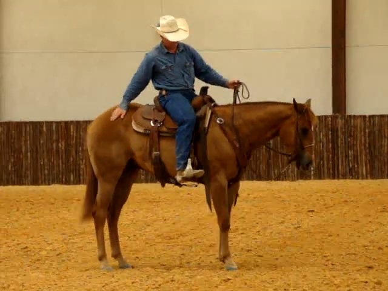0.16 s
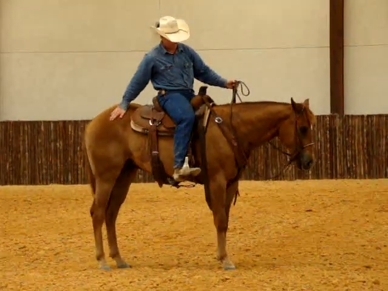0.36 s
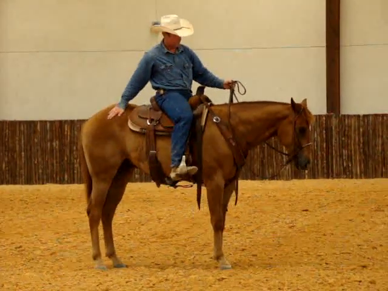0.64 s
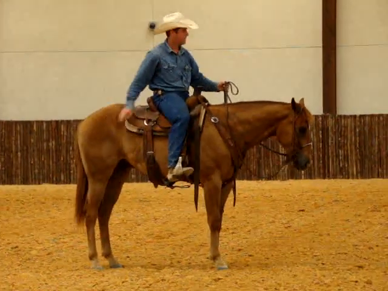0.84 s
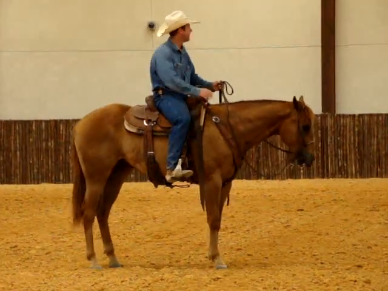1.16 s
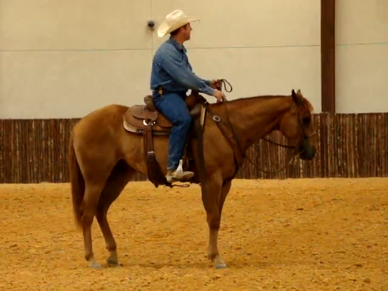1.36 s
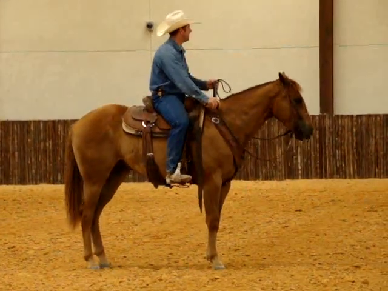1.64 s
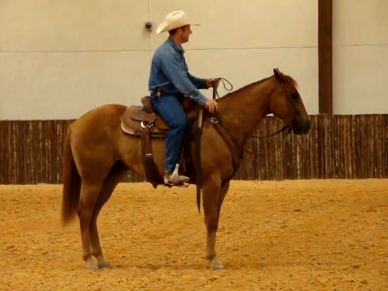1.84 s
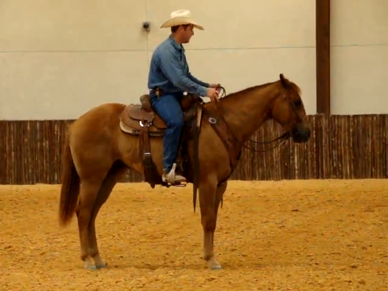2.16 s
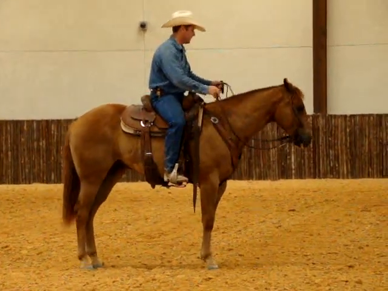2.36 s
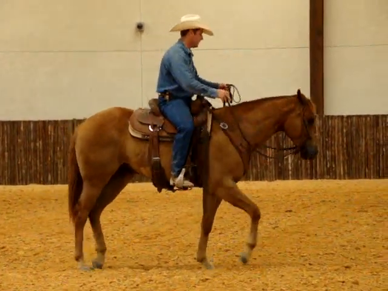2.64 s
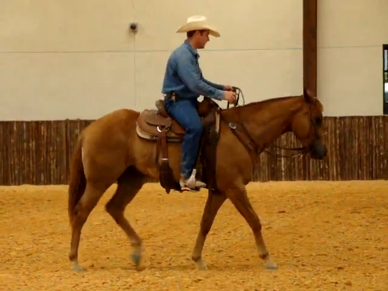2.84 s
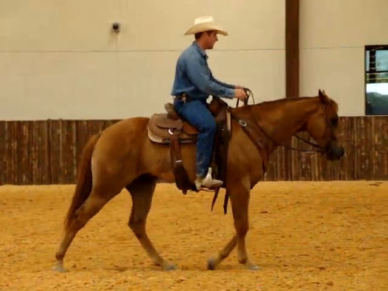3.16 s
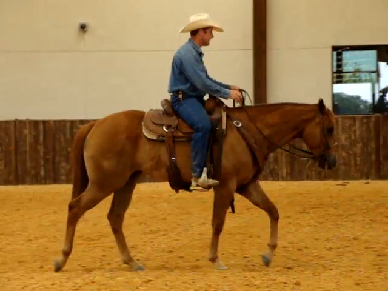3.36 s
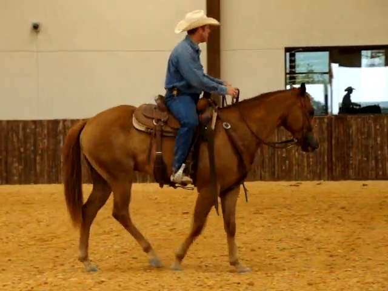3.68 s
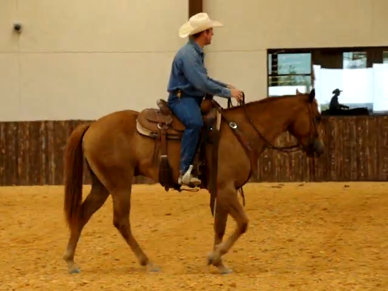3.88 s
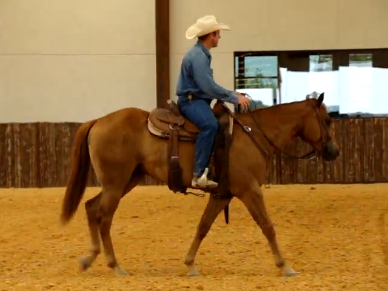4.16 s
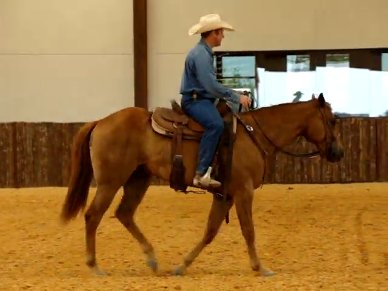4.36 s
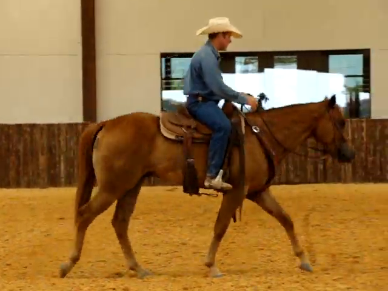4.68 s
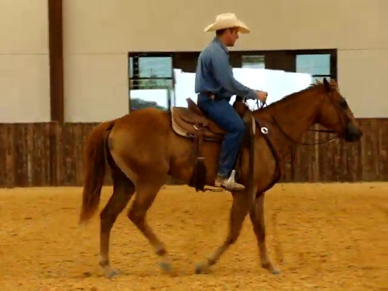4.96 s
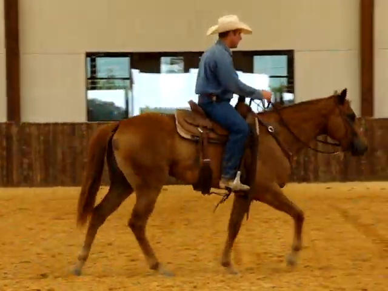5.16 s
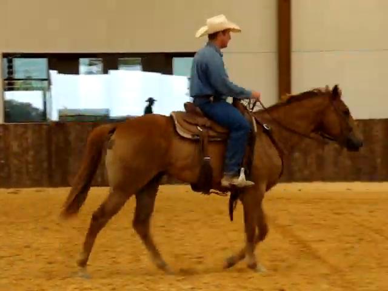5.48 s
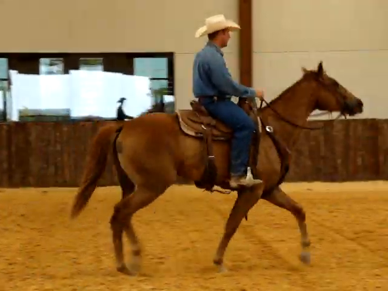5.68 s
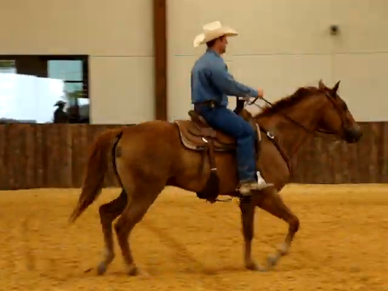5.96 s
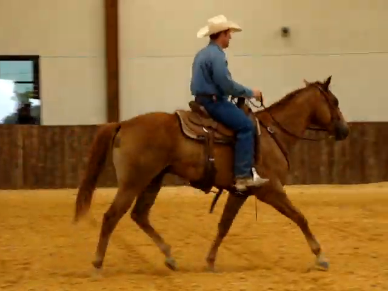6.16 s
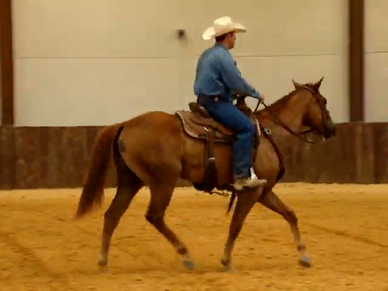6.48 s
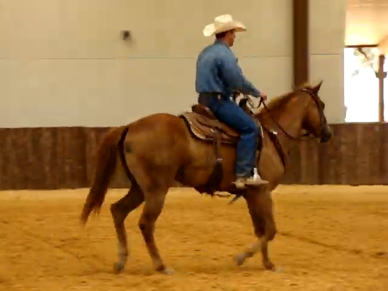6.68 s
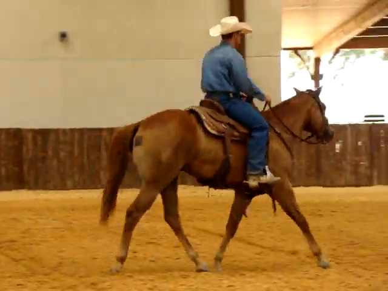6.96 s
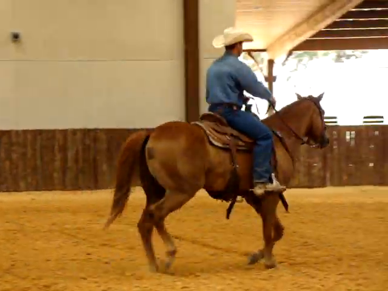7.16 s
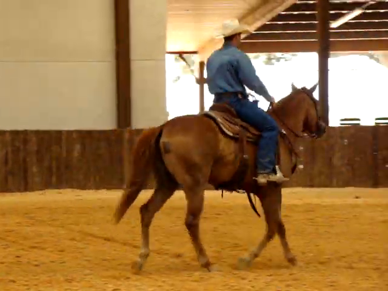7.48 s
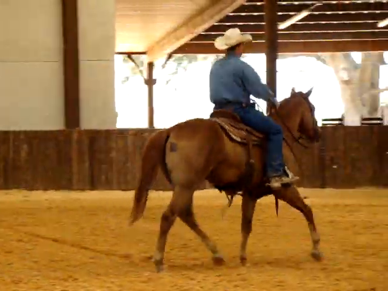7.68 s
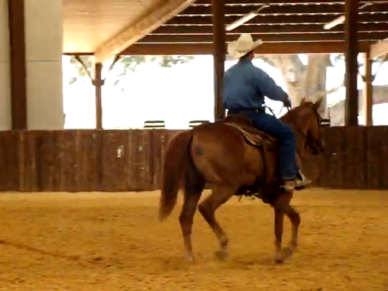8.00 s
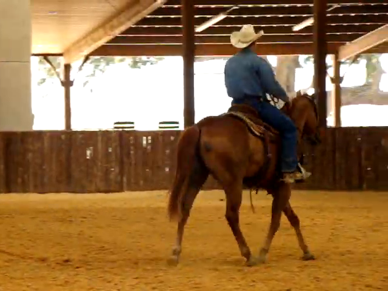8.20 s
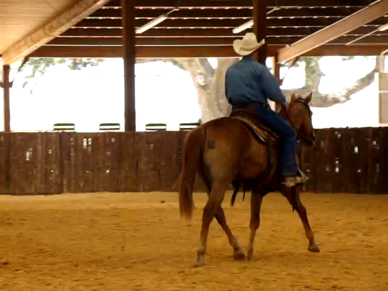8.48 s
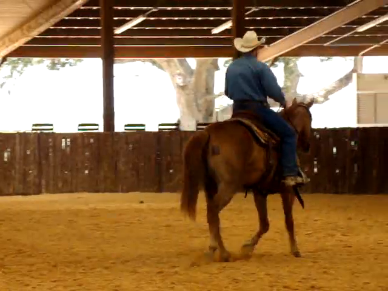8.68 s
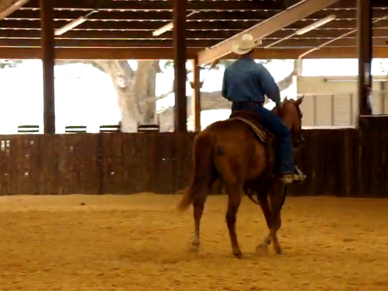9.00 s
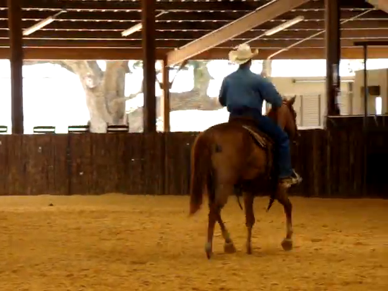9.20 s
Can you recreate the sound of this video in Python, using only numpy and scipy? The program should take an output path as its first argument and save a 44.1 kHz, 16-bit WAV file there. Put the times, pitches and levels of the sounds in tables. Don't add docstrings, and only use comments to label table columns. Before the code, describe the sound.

In a big covered arena, three firm, hollow pats on a horse's rump ring out in the first second and echo off a nearby wall. Sparrows chirp overhead in two syllables throughout. Then small leather and buckle knocks and dry metallic ticks appear, with faint hoof puffs in deep sand later on. Soft airy hiss and faint hum lie beneath, heard through one microphone near the horse, with dull upper treble.

```python
import sys
import numpy as np
from scipy import signal
from scipy.io import wavfile

SR = 44100
rng = np.random.default_rng(int(sys.argv[2]) if len(sys.argv) > 2 else 0)


def natural_amplitude(level_db):
    exponent = np.asarray(level_db, float) / 20
    return 10 ** exponent


def persist_wave(psi):
    counts = np.round(np.clip(psi, -1, 1) * 32767).astype(np.int16)
    wavfile.write(sys.argv[1], SR, np.atleast_2d(counts).T)


N = 411894
LEAD = round(.2 * SR)

# (time [s], peak level [dB], brightness [dB per octave])
PATS = [
    (0.225, -18.5, 3),
    (0.4867, -19.5, 3.5),
    (0.7446, -17.5, 5),
]
# (time [s], peak level [dB], lowest frequency [Hz])
TICKS = [(1.733, -39, 9300), (2.779, -57, 6060), (4.271, -52, 5490), (4.73, -43.5, 5513),
         (6.643, -47, 9070), (6.794, -44, 8970), (7.05, -44.5, 8100), (7.509, -42, 5550),
         (7.661, -46, 5900), (7.718, -42, 5200), (8.37, -40.5, 5200), (8.527, -47, 6500),
         (9.127, -42, 5250)]

FIRST_HABIT = dict(lead_s=.058, lead_db=-21, top_hz=4950, sag=.885, second_hz=3950)
SECOND_HABIT = dict(lead_s=.038, lead_db=-19, top_hz=4850, sag=.91, second_hz=3850)
FAR_HABIT = dict(lead_s=.036, lead_db=-12, top_hz=5350, sag=.78, second_hz=4300)
FLUTTER_SHARE = .009
NEAR_TAIL_DB, FAR_TAIL_DB = 4.5, 5.5


def at_hz(points, hz):
    point_hz, value = np.transpose(points)
    return np.interp(np.log(hz), np.log(point_hz), value)


def band(x, low_hz, high_hz):
    return signal.sosfilt(signal.butter(2, [low_hz, min(high_hz, .45 * SR)], "band", fs=SR, output="sos"), x)


def drift(rate):
    steps = rng.standard_normal(int(N / SR * 40) + 3)
    return np.interp(np.arange(N) / SR * min(rate, 40), np.arange(len(steps)), steps)


def ring(clicks, hz, t60):
    r = natural_amplitude(-60 / (t60 * SR))
    w = 2 * np.pi * hz / SR
    return signal.lfilter([0, np.sin(w)], [1, -2 * r * np.cos(w), r * r], clicks + 1e-18)


def clicks_at(seconds, db):
    train = np.zeros(N)
    train[np.round(np.asarray(seconds) * SR).astype(int)] = natural_amplitude(np.asarray(db))
    return train


def pats():
    # (frequency [Hz], width [Hz], level [dB])
    palm = [
        (481, 216, -7),
        (1300, 770, 2),
        (2370, 590, -7),
        (3260, 820, -11),
        (8000, 10000, -16.5),
    ]
    s, db, bright_db = np.transpose(PATS)
    settle = s + .0027 + rng.normal(0, .0003, len(s))
    out = np.zeros(N)
    for k, (hz, width_hz, level_db) in enumerate(palm):
        octaves = np.log2(hz / 1350)
        train = clicks_at(s, db + level_db + bright_db * octaves + 5)
        train += clicks_at(settle, db + level_db - 9 * abs(octaves) - 16.5)
        out += (-1) ** k * ring(train, hz, np.log(1000) / (np.pi * width_hz))
    return band(out, 190, 15000)


def hooves():
    # (time [s], peak level [dB], pitch [Hz], length [s])
    hoof_falls = [(5.661, -56, 508, 0.031), (5.958, -48, 900, 0.024), (6.35, -51.5, 400, 0.077),
                  (6.7, -45, 600, 0.035), (6.758, -49, 400, 0.061), (7.321, -46.5, 464, 0.097),
                  (7.5, -59, 295.4, 0.067), (7.809, -58, 1700, 0.043), (7.837, -42.5, 1206, 0.087),
                  (8.579, -49, 1092, 0.059), (9.15, -71, 902, 0.057)]
    out = np.zeros(N)
    for s, db, hz, length in hoof_falls:
        start = round(s * SR)
        t = np.arange(round(.3 * SR)) / SR / length
        grains = natural_amplitude(2.5 * rng.standard_normal(len(t) // 128 + 1)).repeat(128)[:len(t)]
        crunch = rng.standard_normal(len(t)) * grains
        puff = band(crunch, hz / 1.9, hz * 2.25) * np.sqrt(SR / hz / 4)
        swell = 4 * t * np.exp(-2.5 * t)
        out[start:][:len(t)] += (natural_amplitude(db) * puff * swell)[:N - start]
    return out


def tack_knocks():
    # (time [s], peak level [dB], pitch [Hz], snap level against the ring [dB])
    knock_list = [(2.137, -46.5, 1300, 2), (2.293, -34.5, 520, -2.5), (3.427, -41, 1510, 2),
                  (4.104, -46, 1940, -5), (4.73, -39.5, 874, -3), (4.772, -46, 1980, 4.5),
                  (4.874, -47.5, 1630, 3.5), (6.067, -44.5, 1665, 4), (6.187, -43.5, 1390, -4),
                  (6.539, -53, 991, 9), (6.79, -47, 1900, 4), (7.803, -37, 1780, -0.5),
                  (7.843, -32, 973, -2.5), (8.156, -55, 442, 12), (8.446, -47, 985, 6),
                  (8.535, -41, 850, -3), (8.59, -39.5, 1080, 0.5), (8.631, -37, 1340, 1),
                  (9.139, -41.5, 950, -6)]
    out = np.zeros(N)
    t = np.arange(round(.04 * SR)) / SR
    for s, db, hz, snap_db in knock_list:
        snap = band(rng.standard_normal(len(t)) * natural_amplitude(-60 * t / 0.02), 440, 3100) * 3.2
        tone = np.sin(2 * np.pi * hz * t) * natural_amplitude(-60 * t / 0.04) * np.minimum(t / 0.00034, 1)
        out[round(s * SR):][:len(t)] += natural_amplitude(db - 1.5) * (tone + natural_amplitude(snap_db) * snap)
    return out


def tack_ticks():
    out = np.zeros(N)
    t = np.arange(round(.04 * SR)) / SR
    for s, db, low_hz in TICKS:
        sputter = rng.standard_normal(len(t)) * natural_amplitude(-60 * t / 0.015)
        out[round(s * SR):][:len(t)] += natural_amplitude(db + 8) * band(sputter, low_hz, 11000)
    return out


def chirp_shape(lead_s, lead_db, top_hz, sag, second_hz):
    rest_hz, knee_hz, end_hz = 2964, 3498, 2805
    creep_hz = rest_hz * 1.09
    sweep_s, plateau_s, drop_s, close_s = .012, .03, .016, 0.00815
    pause_s, open_s, creep_s, climb_s, fall_s, trail_s = .02, .011, .015, .019, .013, .015
    shut_db, trail_db = -35, -8
    leap_db, top_db = -4.5, -3

    before_top = [-lead_s, open_s - lead_s, -2 * sweep_s, -sweep_s, 0]
    stages = [plateau_s, drop_s, close_s, pause_s, open_s, creep_s, climb_s, fall_s, trail_s]
    s = np.sort(np.r_[before_top, np.cumsum(stages)])
    hz = np.array([rest_hz, rest_hz, creep_hz, knee_hz, top_hz, top_hz * sag, knee_hz, creep_hz,
                   rest_hz, (rest_hz + creep_hz) / 2, creep_hz, second_hz, rest_hz, end_hz])
    level_db = np.array([shut_db, lead_db, lead_db, leap_db, top_db, -1.5, -1.5, shut_db,
                         shut_db, -4, -1.5, 1.5, trail_db, shut_db / 2])

    opened = s - np.where(s < s[8], s[1], s[9])
    flare_db = 3 - 301.5 * np.abs(opened) * (1 + 2 * (s > 0)) - 0.5 * (s > 0)
    thinned_db = -8.5 + 40.5 * np.log2(hz / top_hz)
    return s, hz, level_db, np.maximum(flare_db, thinned_db)


def unit_flutter(low_hz, high_hz):
    noise = band(rng.standard_normal(LEAD + N), low_hz, high_hz)
    return noise / noise.std()


def sparrow(calls, habit, overtone_db, rough_db, wobble, waver):
    s, hz, level_db, octave_db = chirp_shape(**habit)
    out = np.zeros(LEAD + N)
    flutter, bend, rasp = unit_flutter(50, 200), unit_flutter(10, 40), unit_flutter(150, 600)
    for top, first_db, second_db, length, pitch in calls:
        start = round((top + s[0]) * SR)
        end = min(round((top + s[-1] * length) * SR), N)
        at = LEAD + np.arange(start, end)
        t = (at - LEAD) / SR - top
        t = np.where(t > 0, t / length, t)
        glide = pitch * np.interp(t, s, hz) * (1 + waver * bend[at] + wobble * flutter[at])
        phase = 2 * np.pi * np.cumsum(glide) / SR
        effort_db = np.where(t < (s[7] + s[8]) / 2, first_db, second_db) + rough_db * flutter[at]
        held_back_db = overtone_db - (1 - 0.14) * (first_db + 37.5)
        voice = natural_amplitude(np.interp(t, s, level_db)) * np.sin(phase)
        voice += natural_amplitude(np.interp(t, s, octave_db) + held_back_db) * np.sin(2 * phase + .75 * rasp[at])
        out[at] += natural_amplitude(effort_db) * voice
    return out


def first_sparrow():
    # (first top [s], first syllable [dB], second syllable [dB], length factor, pitch factor)
    chirps = [
        (.511, -34.5, -40, 0.77, 0.99),
        (.987, -39, -44, 0.91, 1.0),
        (1.483, -34, -38.5, 0.97, 0.97),
        (1.929, -32, -35.5, 0.98, .98),
        (2.512, -37, -40, 0.86, 1.017),
        (3.485, -36, -39.5, 0.86, 1.0),
        (3.891, -43.5, -48, 0.63, .94),
        (4.405, -37.5, -41.5, 0.83, 0.96),
        (5.507, -35.5, -40, 0.79, 1),
        (6.218, -40, -42, 0.94, 1),
    ]
    return sparrow(chirps, FIRST_HABIT, overtone_db=-10.5, rough_db=3.5, wobble=FLUTTER_SHARE, waver=0.02235)


def second_sparrow():
    # (first top [s], first syllable [dB], second syllable [dB], length factor, pitch factor)
    chirps = [
        (-.075, -38, -35, .82, 1.043),
        (3.001, -32.5, -33.5, 0.96, .97),
        (5.109, -35.5, -34.5, .79, 0.98),
        (7.799, -33.5, -38.5, .92, 0.96),
        (8.423, -37, -37, .92, .99),
        (9.209, -36, -40.5, .79, 1.016),
    ]
    return sparrow(chirps, SECOND_HABIT, overtone_db=-16.5, rough_db=4.5, wobble=FLUTTER_SHARE, waver=0.017)


def far_sparrows():
    # (first top [s], first syllable [dB], second syllable [dB], length factor, pitch factor)
    far_chirps = [
        (1.288, -43.5, -41, .85, 1.04),
        (2.28, -44.5, -50.5, 0.94, 1.0),
        (5.85, -49, -51, .6, 1.0),
        (6.51, -46, -51.5, .9, 1.0),
        (8.685, -48.5, -46, 0.95, 1.01),
    ]
    pure_chirps = [
        (4.55, -43, -52, 0.87, 1.04),
        (7.357, -43.5, -51.5, .75, 1.03),
        (7.47, -48.5, -72, 0.73, .98),
        (8.105, -44.5, -60, 0.88, 1.05),
    ]
    far = sparrow(far_chirps, FAR_HABIT, overtone_db=-24.5, rough_db=6.0, wobble=0.024, waver=0.0222)
    pure = sparrow(pure_chirps, SECOND_HABIT, overtone_db=-42.0, rough_db=6.0, wobble=0.025, waver=0.016)
    return far + pure


def chips():
    # (time [s], level [dB], start pitch [Hz])
    chip_list = [(.022, -32.5, 3715), (.616, -34, 3900), (1.011, -38.5, 4100), (1.598, -34, 3697),
                 (5.221, -33.5, 3344), (6.163, -54, 6370), (6.232, -42, 4850), (6.272, -51, 4770),
                 (6.793, -49.5, 5100), (6.875, -54, 3850), (7.799, -30, 4750), (7.897, -36, 3820),
                 (8.207, -45.5, 3640)]
    out = np.zeros(N)
    sag = np.linspace(1, .94, round(.023 * SR))
    for s, db, start_hz in chip_list:
        phase = 2 * np.pi * np.cumsum(start_hz * sag) / SR
        out[round(s * SR):][:len(sag)] += natural_amplitude(db) * np.hanning(len(sag)) * np.sin(phase)
    return out


def air(patchy_db):
    # (frequency [Hz], level [dB per Hz])
    air_spectrum = [(15, -63.5), (25, -20), (54, -18.5), (290, -3), (790, -3.5), (896, -3), (1040, -5.5),
                    (1340, -6.5), (2560, -11), (3210, -10.5), (4230, -10.5), (4560, -5), (6000, -15),
                    (9900, -18.5), (12900, -50), (21800, -120)]
    # (time [s], level [dB])
    air_level = [
        (0, -57),
        (5.6, -56),
        (6.201, -54.5),
        (7.1, -56),
        (8, -55),
        (9.34, -55),
    ]
    # (frequency [Hz], width [Hz], level [dB])
    hums = [
        (120.5, 8, -81.5),
        (885, 14, -71),
        (1342, 12.2, -69.5),
    ]
    edges = 22 * 2 ** np.arange(0, 9.1, 1 / 3)
    white = rng.standard_normal((2, N))
    out = np.zeros(N)
    for k, (low, high) in enumerate(zip(edges, edges[1:])):
        band_db = at_hz(air_spectrum, min(np.sqrt(low * high), 9800)) + patchy_db * drift(9)
        out += natural_amplitude(band_db) * band(white[k % 2], low, high)
    level_db = np.interp(np.arange(N) / SR, *np.transpose(air_level))
    out = out / band(out, 200, 2000).std() * natural_amplitude(level_db + .6)
    for hz, width_hz, db in hums:
        hum = band(white[0][::-1], hz - width_hz / 2, hz + width_hz / 2)
        out += natural_amplitude(db) * hum / hum.std()
    return out


def rafters(echo_db):
    lag, size = rng.random((2, 5))
    return list(zip(.008 + .016 * (np.arange(5) + lag), echo_db + 8 * (size - .5)))


def hall(x, gap_s, rise_s, echoes, tail_db, early_db, lump_db):
    # (frequency [Hz], time to fall 60 dB [s])
    hall_t60 = [
        (200, 6.1),
        (600, 1.13),
        (1500, 0.88),
        (4000, 1.32),
        (8000, 1),
    ]
    t = np.arange(round(1.4 * SR)) / SR
    white = rng.standard_normal((2, len(t)))
    edges = 100 * 2 ** np.arange(0, 7.1, .5)
    tail = np.zeros(len(t))
    for k, (low, high) in enumerate(zip(edges, edges[1:])):
        tail += band(white[k % 2], low, high) * natural_amplitude(-60 * t / at_hz(hall_t60, np.sqrt(low * high)))
    chance = rng.standard_normal(len(t) // 200 + 1).repeat(200)[:len(t)]
    lumps = natural_amplitude(lump_db * chance * np.exp(-t / .25))
    rise = np.clip((t - gap_s) / rise_s, 0, 1)
    tail = tail * lumps * rise * (1 + natural_amplitude(early_db) * np.exp(-t / 0.027))
    response = natural_amplitude(tail_db) * tail / np.sqrt(np.sum(tail ** 2))
    response[0] = 1
    for s, db in echoes:
        response[round(s * SR)] += natural_amplitude(db)
    return signal.fftconvolve(x, response)[len(x) - N:len(x)]


def scene():
    wall_s = .0102
    slaps = hall(pats(), wall_s - .001, 0.00024, [(wall_s, -8)], tail_db=0.0, early_db=7.5, lump_db=2.0)
    horse = hall(tack_knocks() + hooves(), wall_s, 0.0023, [(wall_s, -9)],
                 tail_db=-7.5, early_db=-1.0, lump_db=-0.5)
    first = hall(first_sparrow(), 0.0041, 0.01, rafters(-9), NEAR_TAIL_DB, early_db=2.0, lump_db=6.5)
    second = hall(second_sparrow(), 0.002, 0.014, rafters(-11.5), NEAR_TAIL_DB, early_db=5.0, lump_db=4.5)
    far = hall(far_sparrows(), 0.006, 0.01, rafters(-10.0), FAR_TAIL_DB, early_db=-4.5, lump_db=5.0)
    calls = hall(chips(), 0.003, .01, rafters(-12.5), tail_db=-11.5, early_db=9.0, lump_db=8.0)
    birds = natural_amplitude(3.5) * calls + natural_amplitude(-5.5) * (first + second) + natural_amplitude(-6.0) * far
    mono = slaps + horse + birds + tack_ticks() + air(patchy_db=2.0)
    return np.array([mono, mono])


def starved_treble(x, share, depth_db):
    hz, s, cells = signal.stft(x, SR, nperseg=256)
    luck = rng.random((len(hz) // 4 + 1, len(s) // 3 + 1))
    luck = luck.repeat(4, 0).repeat(3, 1)[:len(hz), :len(s)]
    clicks = np.r_[np.array(TICKS)[:, 0], np.array(PATS)[1:, 0]]
    until_click = clicks[:, None] - s
    ahead = np.any((until_click > .003) & (until_click < .014), axis=0)
    dropped = (luck < share + .55 * ahead) & (hz[:, None] > 5000)
    return signal.istft(cells * np.where(dropped, natural_amplitude(depth_db), 1), SR, nperseg=256)[1][..., :N]


def band_limit(x):
    return signal.sosfilt(signal.butter(12, 10740, fs=SR, output="sos"), x)


def record(dry):
    cut = signal.sosfilt(signal.ellip(12, .5, 60, 10150, fs=SR, output="sos"), dry)
    mix = starved_treble(cut, share=0.089, depth_db=-44)
    return band_limit(mix)


dry = scene()
out = record(dry)
persist_wave(out)
```